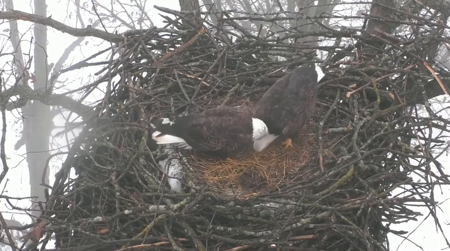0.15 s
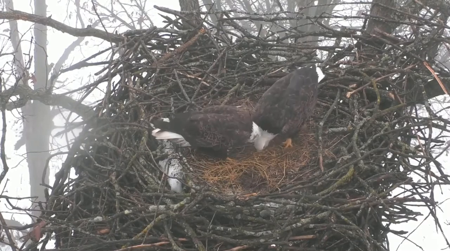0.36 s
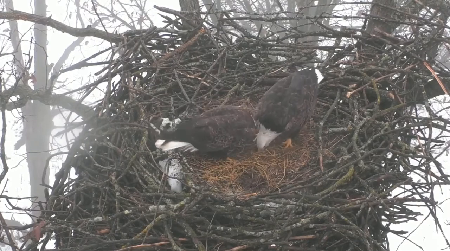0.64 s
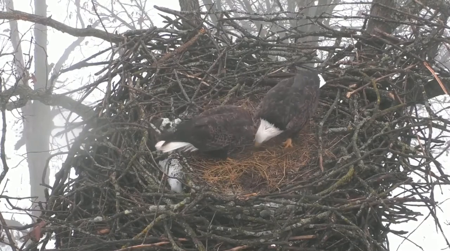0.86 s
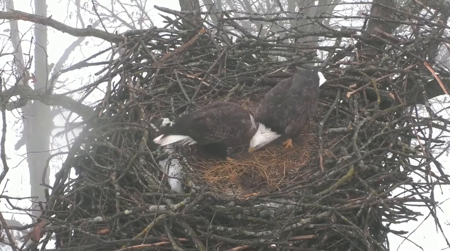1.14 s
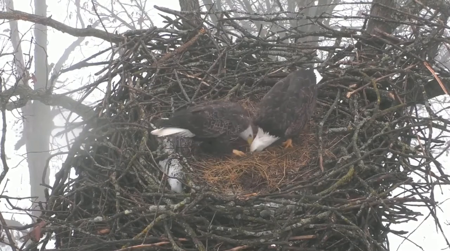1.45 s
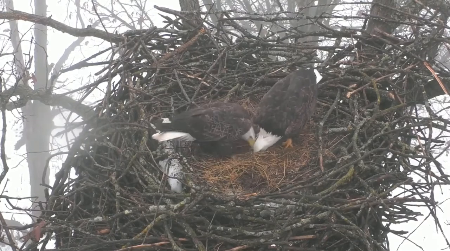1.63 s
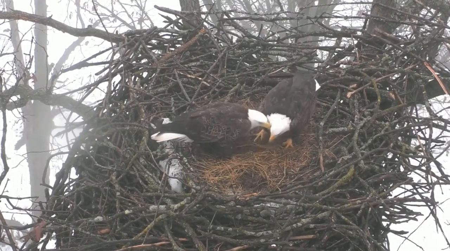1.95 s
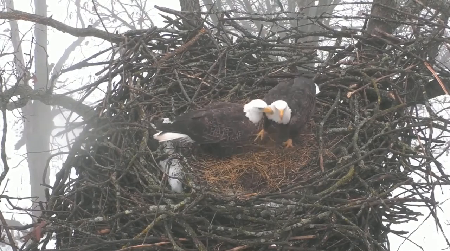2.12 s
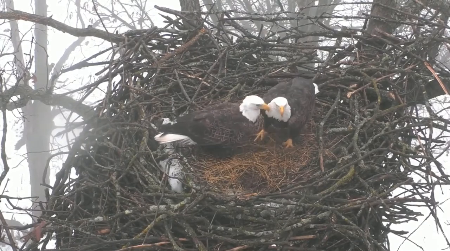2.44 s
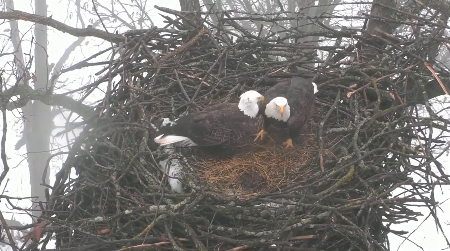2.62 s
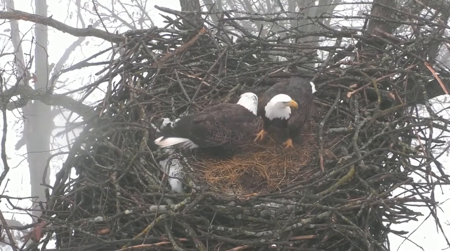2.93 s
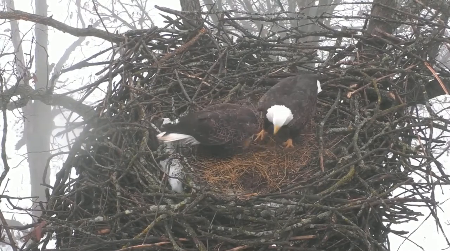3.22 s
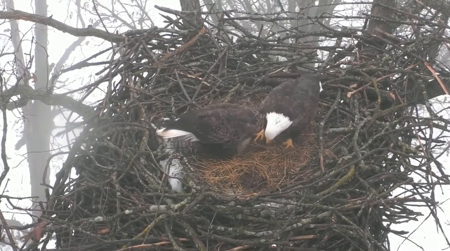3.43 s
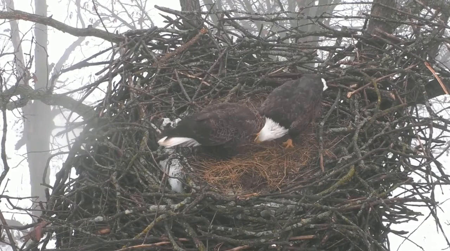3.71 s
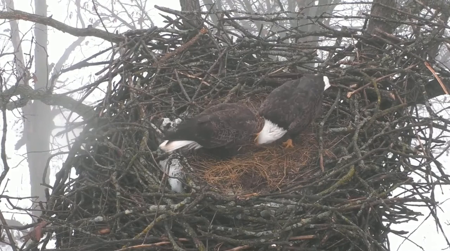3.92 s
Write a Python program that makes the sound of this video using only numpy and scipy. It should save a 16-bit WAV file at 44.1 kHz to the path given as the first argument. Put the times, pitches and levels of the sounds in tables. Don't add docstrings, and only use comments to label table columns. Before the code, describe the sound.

Quick piped chirps from a bald eagle at its nest, raspy and fluttering, with wind rumbling on the microphone and a faint high whine.

```python
import sys
import numpy as np
from scipy import signal
from scipy.fft import rfft, irfft, next_fast_len
from scipy.io import wavfile

SR = 44100
rng = np.random.default_rng(int(sys.argv[2]) if len(sys.argv) > 2 else 0)


def undo_db(level):
    steps = np.asarray(level, float) / 20
    return 10 ** steps


def output_pcm(signal):
    pcm = np.clip(np.atleast_2d(signal).T, -1, 1) * 32767
    wavfile.write(sys.argv[1], SR, np.round(pcm).astype(np.int16))


N = 179531

# loudest_s, tail_s, from_hz, voice_db, rasp_db
CHIRPS = [(.495, .035, 3380, -54, -61), (.548, .065, 3330, -53, -62), (.69, .04, 3290, -52, -62),
          (.772, .04, 3440, -52, -64), (.886, .04, 3200, -53, -64), (.95, .075, 3400, -54, -64),
          (1.097, .06, 3210, -56, -66), (1.166, .045, 3330, -51, -64), (1.357, .1, 3290, -50, -64),
          (1.512, .15, 3260, -49, -62), (1.72, .1, 2980, -45, -60), (1.918, .085, 3310, -43, -58),
          (2.125, .06, 3070, -37, -50), (2.332, .075, 3250, -48, -57), (2.538, .06, 3070, -43, -56),
          (2.748, .06, 3090, -43, -57), (2.952, .065, 3360, -42, -54), (3.169, .055, 3060, -41, -53)]
# start_s, length_s, from_hz, to_hz, level_db
LEAD_INS = [(.453, .026, 2640, 2680, -53), (.466, .026, 2760, 3320, -55), (.612, .036, 2620, 2400, -60),
            (.643, .042, 2540, 3180, -57), (1.286, .06, 3110, 3280, -58), (2.052, .03, 2700, 2920, -55),
            (2.258, .036, 2680, 2950, -60), (2.466, .024, 2750, 2760, -57), (3.09, .045, 2820, 2920, -61),
            (.493, .028, 3800, 4350, -68), (.665, .05, 3850, 4300, -69)]
# pitch_hz, level_db (per Hz)
THROAT_SPECTRUM = [(2300, -80), (2800, -26), (3130, -8), (3340, 0), (3520, -7), (3850, -26), (4500, -80)]
# pitch_hz, level_db (per Hz)
RASP_SPECTRUM = [(1200, -23), (1650, -2.5), (1950, -26), (2150, 2.5), (2900, 10.5), (3900, 7), (4600, -9.5),
                 (5000, -20), (7000, -25.5), (8000, -52), (9000, -90)]
# start_s, length_s, from_hz, to_hz, level_db
PEEPS = [(.032, .084, 2510, 2470, -60), (.05, .02, 6600, 6000, -81), (.115, .09, 4830, 4880, -84),
         (.165, .075, 4380, 4420, -83), (.17, .07, 5450, 5600, -89), (.24, .032, 3280, 3130, -65),
         (.325, .072, 6450, 7250, -82), (.32, .02, 3050, 3150, -67), (.356, .018, 3080, 3020, -65),
         (.372, .045, 2120, 2030, -70), (.5, .04, 4480, 4500, -76), (1.255, .03, 4080, 4120, -74),
         (1.68, .11, 4600, 4450, -76), (3.53, .03, 900, 810, -62), (3.56, .045, 950, 1020, -67)]
# time_s, level_db
GUSTS = [(0.0, -48.5), (0.14, -46), (0.68, -50), (0.7, -47), (1.0, -50.5), (1.03, -44), (1.3, -48),
         (1.33, -44.5), (1.94, -50), (1.97, -53.5), (2.78, -49.5), (2.81, -57.5), (2.89, -46.5),
         (3.21, -40.5), (3.43, -51), (3.68, -48), (4.01, -51.5), (4.07, -54)]
# pitch_hz, level_db (per Hz)
RUMBLE_SPECTRUM = [(8.8, -32), (15, -9.5), (48, 3), (102, 1), (124, -1.5), (319, -18), (372, -20.5),
                   (600, -27), (780, -36), (1320, -120)]
# pitch_hz, level_db (per Hz)
AIR_SPECTRUM = [(200, -8), (400, 1.5), (560, -5), (800, 0), (980, 2.5), (1200, -5.5), (1550, -9.5),
                (1900, -27), (2200, -6), (2700, -2), (3300, -7), (3900, -14), (4600, -29.5), (6000, -94)]
# pitch_hz, level_db (per Hz)
HISS_SPECTRUM = [(300, 13.5), (5000, -5), (8000, -2), (11500, -1.5), (14000, -9), (15600, -6.5),
                 (16000, -9.5)]
# middle_s, length_s, depth_db
GAPS = [(.293, .019, -20), (.444, .021, -21), (.7425, .022, -20), (1.1875, .024, -19), (1.701, .021, -20),
        (2.438, .044, -30), (2.535, .019, -18), (2.682, .025, -22), (3.004, .017, -21), (3.0885, .022, -21),
        (3.2185, .018, -19), (3.43, .021, -21), (3.645, .023, -22), (3.922, .021, -20)]

AIR_DB, HISS_DB = -59.5, -71.5
WHINE_HZ, WHINE_DB = 10107, -53.5
TREES_T60_S, TREES_DB = .38, -11
VOICE_TRIM_DB, RASP_TRIM_DB = -1.5, 1
TOP_HZ, TAIL_RISE_HZ = 3325, 45
STROKE_S, CLIMB_STROKE_S = .029, .019
STROKE_SPREAD_DB, STROKE_SPREAD_HZ = 1.5, 55
CLIMB_HZ_PER_STROKE = 290
CLIMB_DB, TAIL_DB = 5.5, 11.5
BREATH_DB, BREATH_RISE_DB_PER_S = -8.5, 400
RASP_LEAD_S = .054
RASP_SWELL_DB_PER_S, RASP_EDGE_DB_PER_S = 85, 900
RASP_GRAIN_DB, RASP_GRAIN_HZ = 2.6, 150


def rms_one(x):
    return x / np.sqrt(np.mean(x ** 2) + 1e-20)


def coloured(spectrum):
    size = next_fast_len(N)
    table_hz, db = np.transpose(spectrum)
    hz = np.arange(size // 2 + 1) * SR / size
    gain = undo_db(np.interp(np.log(hz + 1), np.log(table_hz), db))
    noise = irfft(rfft(rng.standard_normal(size)) * gain, size)
    return rms_one(noise[:N])


def drift(rate_hz):
    r = np.exp(-2 * np.pi * rate_hz / SR)
    wander = signal.lfilter([1], [1, -2 * r, r * r], rng.standard_normal(N + SR))
    return rms_one(wander[SR:])


def glides(rows, waver_hz, soft):
    out = np.zeros(N)
    for start_s, length_s, from_hz, to_hz, level_db in rows:
        first, size = round(start_s * SR), round(length_s * SR)
        pitch_hz = np.linspace(from_hz, to_hz, size) + waver_hz[first:first + size]
        tone = np.sin(2 * np.pi * np.cumsum(pitch_hz) / SR)
        fade = signal.windows.tukey(size, soft)
        out[first:first + size] += undo_db(level_db + .5) * fade * tone
    return out


def hiss():
    return undo_db(HISS_DB) * coloured(HISS_SPECTRUM)


def whine():
    pitch_hz = WHINE_HZ + 2.2 * drift(3) + 52 * drift(1500)
    tone = np.sqrt(2) * np.sin(2 * np.pi * np.cumsum(pitch_hz) / SR)
    return undo_db(WHINE_DB + .14 * drift(300)) * tone


def faint_gain():
    t, db = np.arange(N) / SR, np.zeros(N)
    for middle_s, length_s, depth_db in GAPS:
        closeness = 1 - np.abs(t - middle_s) * 2 / length_s
        db += depth_db * np.clip(1.4 * closeness, 0, 1)
    return undo_db(db)


def air():
    return undo_db(AIR_DB + .48 * drift(2)) * coloured(AIR_SPECTRUM)


def wind():
    time_s, db = np.transpose(GUSTS)
    gust_db = np.interp(np.arange(N) / SR, time_s, db)
    return undo_db(gust_db + 2 * drift(45)) * coloured(RUMBLE_SPECTRUM)


def trees(x):
    lag_s = np.arange(SR // 2) / SR
    sparse = rng.random(len(lag_s)) < 2500 / SR
    echoes = rng.standard_normal(len(lag_s)) * sparse * (lag_s > .004)
    echoes = echoes * undo_db(-60 * lag_s / TREES_T60_S)
    echoes = echoes / np.sqrt(np.sum(echoes ** 2))
    return undo_db(TREES_DB) * signal.fftconvolve(x, echoes)[:N]


def peeps():
    return glides(PEEPS, 16 * drift(100), soft=.35) * undo_db(1.3 * drift(80))


def strokes():
    rows = []
    for loudest_s, tail_s, from_hz, voice_db, _ in CHIRPS:
        chance = rng.standard_normal((16, 2))
        rises = max(0, round((TOP_HZ - from_hz) / CLIMB_HZ_PER_STROKE))
        climb_s = rises * CLIMB_STROKE_S + 1e-6
        peak_hz = TOP_HZ if rises else from_hz
        path_s = [-2 * climb_s, -climb_s, 0, tail_s]
        path_hz = [2 * from_hz - peak_hz, from_hz, peak_hz, TOP_HZ + TAIL_RISE_HZ]
        for step, (louder, higher) in zip(range(-rises, int(tail_s / STROKE_S) + 1), chance):
            length_s = CLIMB_STROKE_S if step < 0 else STROKE_S
            at_s = step * length_s
            ends_hz = np.interp(at_s + np.array([-.15, .15]) * length_s, path_s, path_hz)
            level_db = voice_db + VOICE_TRIM_DB
            if step < 0:
                level_db += step * CLIMB_DB
            else:
                level_db -= TAIL_DB * np.sqrt(at_s / tail_s)
            if step > 0:
                ends_hz = ends_hz + STROKE_SPREAD_HZ * higher
                level_db += STROKE_SPREAD_DB * louder
            rows.append((loudest_s + at_s - length_s / 2, length_s, *ends_hz, level_db))
    return rows + LEAD_INS


def raptor():
    t = np.arange(N) / SR
    waver_hz = 18 * drift(90) + 40 * drift(500)
    voice = glides(strokes(), waver_hz, soft=.55) * undo_db(1.8 * drift(160))
    throat, rasp = coloured(THROAT_SPECTRUM), coloured(RASP_SPECTRUM)
    grain_db = RASP_GRAIN_DB * drift(RASP_GRAIN_HZ)
    breath_power, rasp_power = np.zeros(N), np.zeros(N)
    for loudest_s, tail_s, _, voice_db, rasp_db in CHIRPS:
        after_s = t - loudest_s
        breath_fall_db = np.where(after_s < 0, -after_s * BREATH_RISE_DB_PER_S, after_s * TAIL_DB / tail_s)
        breath_power += undo_db(2 * (voice_db + VOICE_TRIM_DB + BREATH_DB - breath_fall_db))
        outside_s = np.maximum(0, np.maximum(-RASP_LEAD_S - after_s, after_s - tail_s))
        rasp_fall_db = RASP_SWELL_DB_PER_S * np.abs(after_s - .01) + RASP_EDGE_DB_PER_S * outside_s
        rasp_power += undo_db(2 * (rasp_db + RASP_TRIM_DB - rasp_fall_db))
    breath = np.sqrt(breath_power) * throat * undo_db(grain_db / 2)
    return voice + breath + np.sqrt(rasp_power) * rasp * undo_db(grain_db)


def scene():
    birds = raptor() + peeps()
    return (birds + trees(birds) + air() + wind())[None]


def top_cut(x):
    return signal.sosfilt(signal.butter(12, 15760, fs=SR, output="sos"), x)


def record(dry):
    high_pass = signal.butter(8, 3780, "high", fs=SR, output="sos")
    null_band = signal.butter(3, [1650, 2080], "band", fs=SR, output="sos")
    top = signal.sosfiltfilt(high_pass, dry)
    null = signal.sosfiltfilt(null_band, dry)
    faint = top + null + hiss()
    mix = dry - top - null + faint_gain() * faint + whine()
    return top_cut(mix)


dry = scene()
out = record(dry)
output_pcm(out)
```